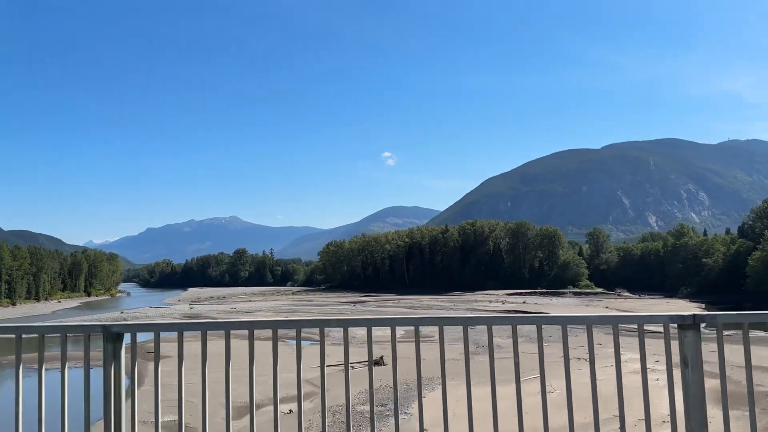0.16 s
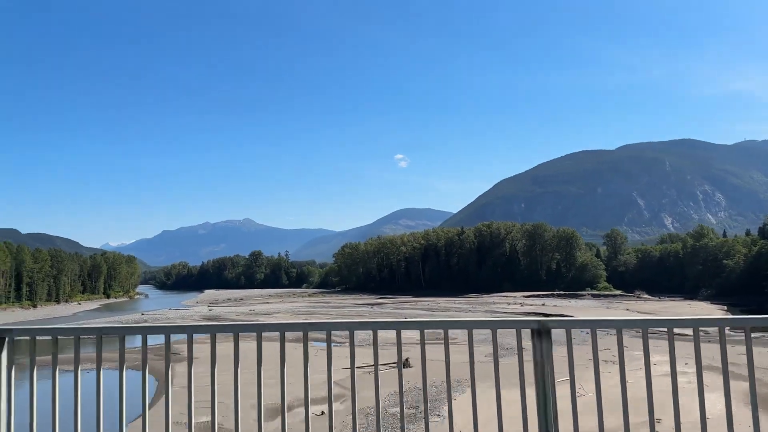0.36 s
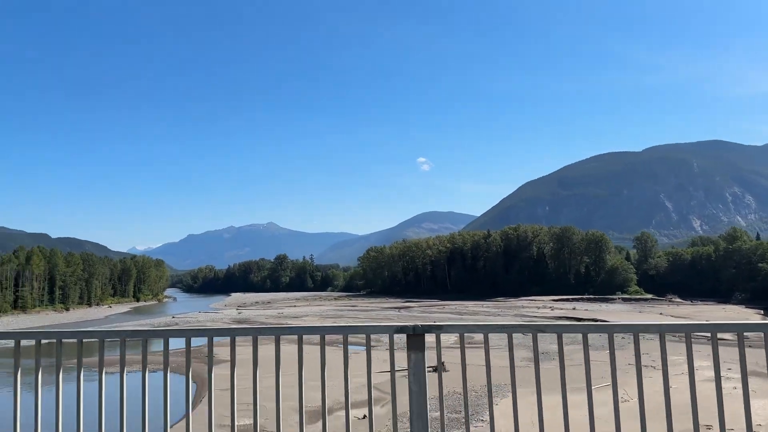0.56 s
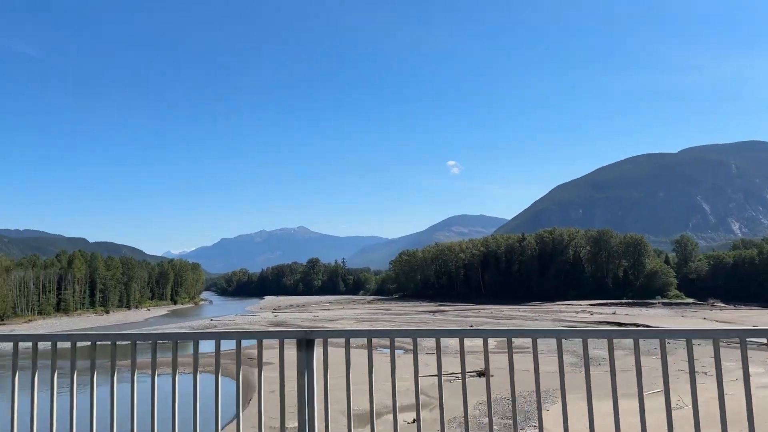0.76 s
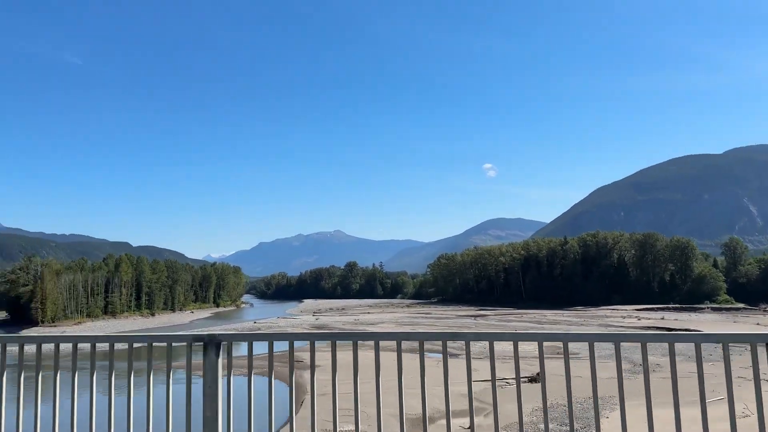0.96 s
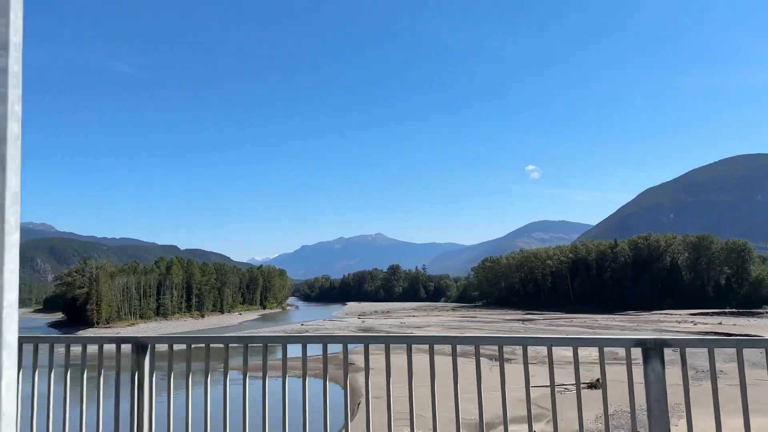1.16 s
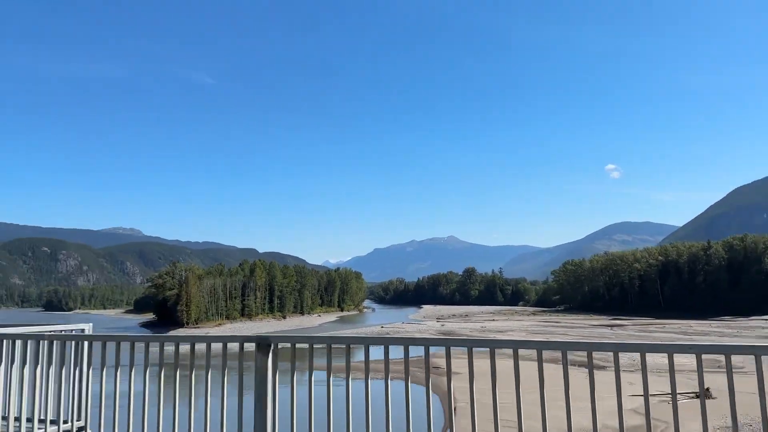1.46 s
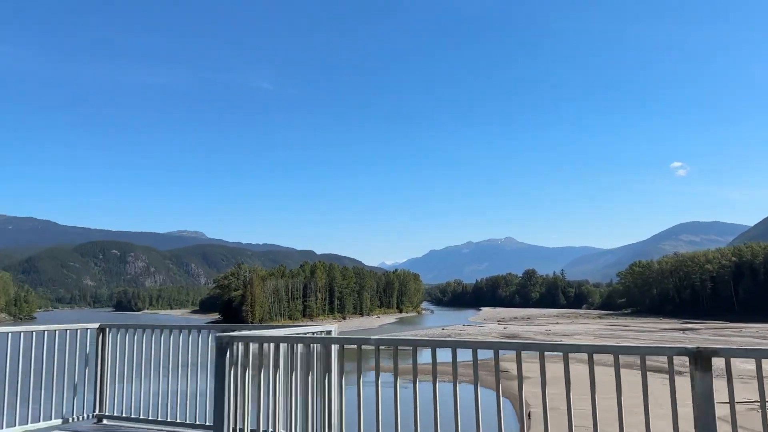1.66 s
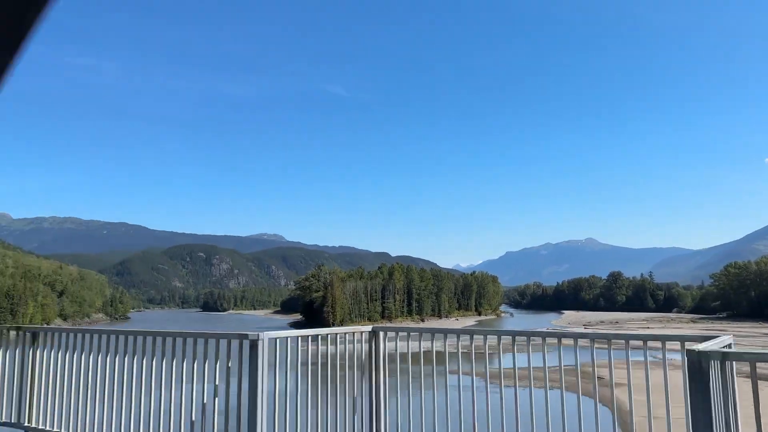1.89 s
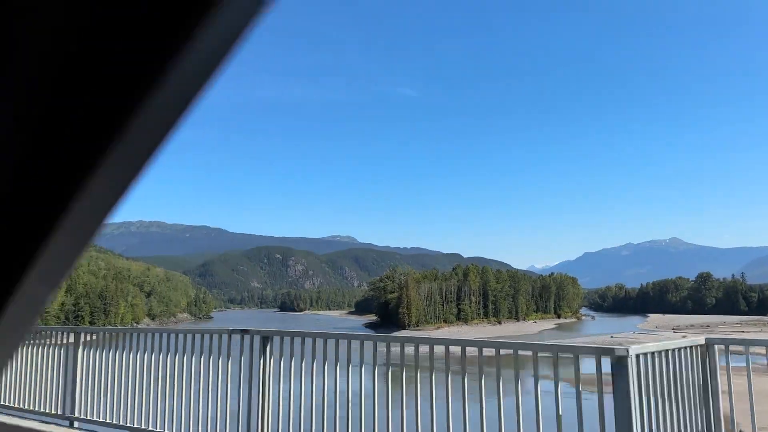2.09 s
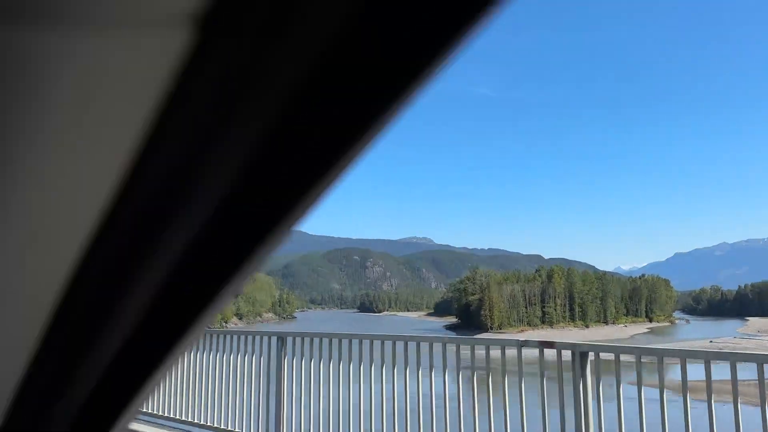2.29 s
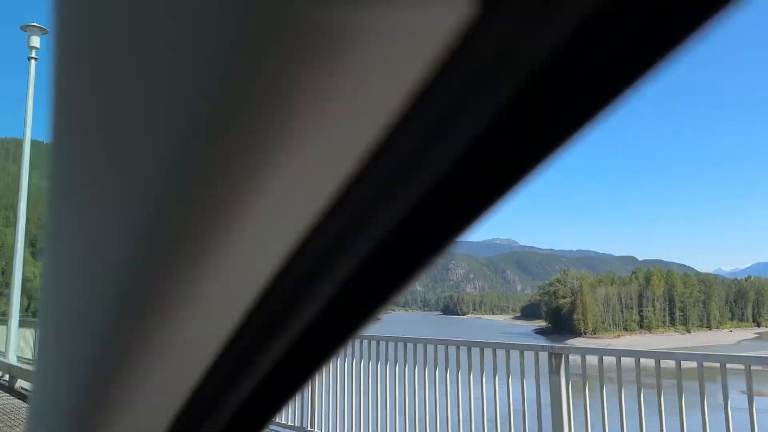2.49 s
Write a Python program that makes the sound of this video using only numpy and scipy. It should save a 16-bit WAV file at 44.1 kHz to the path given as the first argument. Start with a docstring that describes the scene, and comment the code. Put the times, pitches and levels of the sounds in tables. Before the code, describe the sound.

Low road rumble, tyre roar and soft air hiss fill the cabin of a car on a bridge. Quick knocks and thumps come first, then a stronger bump and two deep thuds, before the engine booms louder.

```python
"""Inside a car crossing a bridge. From the start the engine drones over road rumble, tyre roar and air hiss.
In the first second, joints and bumps in the deck thump the body and make the trim knock in quick
succession, among faint rustles and thin squeaks. A harder bump follows and the engine's hum swells.
Just after two seconds come the two heaviest thuds, and at the end the engine booms in the cabin."""
import sys
import numpy as np
from scipy import signal
from scipy.fft import rfft, irfft
from scipy.io import wavfile

SR = 44100
rng = np.random.default_rng(int(sys.argv[2]) if len(sys.argv) > 2 else 0)


def store_wav(level_fs):
    """Save 16-bit WAV to argv[1]."""
    pcm = np.round(np.clip(np.atleast_2d(level_fs), -1, 1) * 32767)
    wavfile.write(sys.argv[1], SR, pcm.T.astype(np.int16))


N = 116424
LOW_LEFT_DB = 1.36  # engine, knocks and thuds sit a little to the left


def amp(db):
    """Decibels to gain."""
    return 10 ** (np.asarray(db) / 20)


def unit(x):
    """Scales to rms 1."""
    return x / np.sqrt(np.mean(x ** 2) + 1e-20)


def curve(points):
    """An automation curve through (seconds, value) points."""
    return np.interp(np.arange(N) / SR, *np.transpose(points))


def read(points, hz):
    """Reads (Hz, value) points on a log-frequency axis."""
    f, value = np.transpose(points)
    return np.interp(np.log(hz + 1), np.log(f + 1), value)


def add(mix, start, sound):
    """Mixes a sound in at a start time in seconds."""
    part = mix[:, max(round(start * SR), 0):][:, :sound.shape[-1]]
    part += sound[..., :part.shape[1]]


def pan(left_db):
    """Left and right gains, with the left louder by left_db."""
    return amp(np.array([[.5], [-.5]]) * left_db)


def wander(top_hz):
    """Random modulation of rms 1, rolling off above top_hz."""
    hz = np.fft.rfftfreq(N, 1 / SR)
    return unit(irfft(rfft(rng.standard_normal(N)) / (1 + (hz / top_hz) ** 4), N))


def noise(gain, likeness=None):
    """Stereo noise of rms 1, shaped by gain(Hz) and leaning left."""
    # Stereo width. Each row: frequency in Hz, likeness of left and right (held within -1 to 1 below).
    likenesses = [(30, 1.5), (85, 0.6), (170, 0.8), (250, 1.05), (390, 0.61), (630, 0.57), (1000, 0.16),
                  (1400, -0.1), (2000, 0.65), (2700, 0.5), (4500, 0.23), (6400, 0.43), (8300, -0.94),
                  (10000, 0.6), (12000, 2.7)]
    # Stereo balance. Each row: frequency in Hz, left minus right in dB.
    balance = [(30, .6), (80, 3.7), (250, 0.26), (500, 4.4), (1000, 4), (2000, 1.4), (4000, 4.4),
               (8000, .6), (14000, .6)]
    hz = np.fft.rfftfreq(N, 1 / SR)
    left, other = rfft(rng.standard_normal((2, N)))
    alike = np.clip(read(likenesses, hz) if likeness is None else likeness, -1, 1)
    right = alike * left + np.sqrt(1 - alike ** 2) * other
    return unit(irfft(np.array([left, right]) * gain(hz) * pan(read(balance, hz)), N))


def rush(spectrum, level, shake_db, shake_hz):
    """A noise bed that rides its level curve and shakes with the road surface."""
    return noise(lambda hz: amp(read(spectrum, hz))) * amp(curve(level) + shake_db * wander(shake_hz))


def swell(u):
    """A quick rise to 1 at u = 2 and an exponential fall."""
    return (u / 2) ** 2 * np.exp(2 - u)


def ring(modes, t, rise_s, scatter=0):
    """Damped modes after a blow; scatter detunes them a little each time."""
    tone = 0
    for hz, db, t60 in modes:
        detune = 1 + scatter * rng.standard_normal()
        tone += amp(db - 60 * t / t60) * np.sin(2 * np.pi * hz * detune * t)
    return (1 - np.exp(-t / rise_s)) ** 2 * tone


def engine():
    """Harmonics of the firing rate, each swelling, fluttering and drifting in the cabin."""
    # Firing rate. Each row: time in seconds, rate in Hz.
    firing = [(0, 89.02), (.35, 88.57), (.7, 87.94), (1.2, 87.5), (1.8, 87.28), (2.4, 86.76), (2.64, 86.5)]
    # First, second and third harmonic. Each row: time in seconds, level in dB.
    boom = [(0, -36.5), (.9, -35.5), (1.08, -24.5), (1.25, -33.5), (1.4, -26), (1.85, -26.5), (2.08, -22.5),
            (2.29, -25), (2.44, -29), (2.495, -12.5), (2.55, -14), (2.64, -16.5)]
    drone = [(0, -16.5), (.055, -52), (.1, -25.5), (.15, -32.5), (.2, -28), (.29, -26), (.335, -21.5),
             (.4, -37), (.62, -43.5), (.68, -21), (.8, -22.5), (.87, -43), (1.05, -28.5), (1.25, -28.5),
             (1.45, -24), (1.78, -23), (1.87, -25), (2.03, -24.5), (2.11, -22.5), (2.2, -17.5),
             (2.29, -30.5), (2.345, -23.5), (2.405, -21), (2.45, -48), (2.57, -21), (2.64, -29.5)]
    hum = [(0, -46), (1.25, -44), (1.4, -34), (1.8, -29), (1.95, -30.5), (2.64, -49.5)]
    # Overtones that follow the hum. Each row: harmonic number, level in dB against the third.
    overtones = [(4, -8), (5, -5), (6, -10.5), (7, -12)]
    turns = np.cumsum(curve(firing) * (1 + .011 * wander(top_hz=17.4))) / SR
    harmonics = [(1, curve(boom)), (2, curve(drone)), (3, curve(hum))]
    harmonics += [(round(k), curve(hum) + db) for k, db in overtones]
    tone = np.zeros(N)
    for k, db in harmonics:
        drift_turns = .08 * np.sqrt(k - 1) * wander(top_hz=19)
        flutter_db = 3 * wander(top_hz=21.8)
        tone += amp(db + flutter_db) * np.sin(2 * np.pi * (k * turns + drift_turns + rng.random()))
    return np.sqrt(2) * tone * pan(LOW_LEFT_DB)


def road_rumble():
    """The deep, uneven rumble of the road under the car."""
    # Tone colour. Each row: frequency in Hz, relative level in dB.
    spectrum = [(15, -42), (30, -29.5), (48, -0.5), (70, 4), (110, -1.5), (160, 1), (220, -11),
                (320, -14.5), (600, -34), (2000, -95.5)]
    # Fader ride. Each row: time in seconds, level in dB.
    level = [(0, -45), (.14, -30.5), (.22, -25), (.35, -28), (.53, -26.5), (.62, -36), (.92, -26),
             (1.1, -27.5), (1.169, -15), (1.23, -37), (1.31, -36), (1.37, -28), (1.6, -29), (1.87, -21.5),
             (2.03, -21), (2.12, -22.5), (2.29, -24), (2.38, -21), (2.64, -23.5)]
    return rush(spectrum, level, shake_db=3.5, shake_hz=15.8)


def tyre_roar():
    """The midrange roar of tyres rolling on the deck."""
    # Tone colour. Each row: frequency in Hz, relative level in dB.
    spectrum = [(60, -31), (200, -11.5), (300, -1.5), (520, 0), (720, -6.5), (1000, -13.5), (1400, -28.5),
                (2500, -57.5), (6000, -80)]
    # Fader ride. Each row: time in seconds, level in dB.
    level = [(0, -33), (.1, -35.5), (.21, -28), (.3, -31), (.5, -36.5), (.68, -34.5), (.95, -34),
             (1.15, -29.5), (1.3, -30), (1.5, -30.5), (1.8, -28), (2.05, -30.5), (2.3, -30.5), (2.4, -28),
             (2.64, -31)]
    return rush(spectrum, level, shake_db=.33, shake_hz=44)


def air_hiss():
    """The soft, broad hiss of air streaming past."""
    # Tone colour. Each row: frequency in Hz, relative level in dB.
    spectrum = [(100, -20.5), (700, 0), (1200, 3), (1700, 1), (2800, -9.5), (4500, -13), (6000, -19.5),
                (7200, -16), (8300, -18.5), (9500, -19), (10600, -21), (11800, -31), (14500, -32.5),
                (16000, -38)]
    # Fader ride. Each row: time in seconds, level in dB.
    level = [(0, -49), (.5, -44.5), (.7, -47.5), (1.3, -46), (2.1, -47), (2.5, -46.5), (2.64, -47)]
    return rush(spectrum, level, shake_db=.66, shake_hz=30)


def rubs(events):
    """Bands of noise that swell quickly and fade slowly."""
    out = np.zeros((2, N))
    for start, length, db, centre_hz, octaves in events:
        progress = np.arange(0, length, 1 / SR) / length
        arch = np.sin(np.pi * progress ** .49)
        band = noise(lambda hz: np.exp(-.5 * (np.log2((hz + 1) / centre_hz) / octaves) ** 2))
        add(out, start, amp(db) * arch * band[:, :len(arch)])
    return out


def rustles():
    """Faint, brief brushes of treble noise."""
    # Each row: start in seconds, length in seconds, level in dB, centre in Hz, width in octaves.
    events = [(.168, 0.08, -49, 4400, 0.66), (.425, 0.053, -55, 4960, 0.43), (.47, .1, -60, 4000, 0.38),
              (1.315, 0.11, -55, 6260, 0.54), (1.565, .04, -56, 11100, 0.23), (2.47, .06, -56, 6900, 0.49)]
    return rubs(events)


def trim_crack(t, pitch_hz):
    """The trim cracks: a burst of grit over two fast-dying modes."""
    # Modes of the snap. Each row: share of the crack's pitch, level in dB, seconds to fall 60 dB.
    snap_modes = [(.68, 11, 0.0083), (1, 4.5, 0.012)]

    def grit_band(hz):
        """Rolls off gently below 300 Hz and steeply above the pitch."""
        return hz / (hz + 300) / (1 + hz / pitch_hz) / np.sqrt(1 + (hz / pitch_hz) ** 6.4)

    burst = swell(t / .00085)
    grit = noise(grit_band, likeness=.5)[:, :len(t)] * burst
    modes = [(share * pitch_hz, db, t60) for share, db, t60 in snap_modes]
    snap = np.array([ring(modes, t, rise_s=.00048, scatter=.028) for side in range(2)])
    return snap + amp(-4.5) * unit(grit) * np.sqrt(np.mean(burst ** 2))


def knock(t, hz, rise_cycles):
    """A damped knock that drops in pitch."""
    sag = .12  # roughly the share of pitch lost each cycle
    turns = np.log1p(sag * hz * t) / sag
    return swell(2 * t * hz / rise_cycles) * np.sin(2 * np.pi * turns)


def bumps():
    """Each bump is a short crack and ring of the trim, a damped knock, then the thud of the cabin modes."""
    # Each row: start in seconds, thud level in dB, knock level in dB, knock pitch in Hz, knock rise in
    # cycles, panel level in dB, panel speed as a ratio, crack level in dB, crack pitch in Hz.
    hits = [(.2025, -25, -15, 275, 1.6, -39, 1.7, -35, 1500),
            (0.2500, -11, -7.5, 230, 0.71, -21, 0.98, -25.5, 1800),
            (.316, -39, -18.5, 171, 1.7, -38, 1.1, -46, 1500),
            (0.3481, -21, -13, 294, 2, -16.5, 1.133, -35, 1610),
            (0.3553, -38, -33, 230, 0.92, -41, 0.73, -37.5, 1750),
            (.418, -22, -14.5, 570, 2.1, -31, .9, -34, 1570),
            (0.4238, -12.5, -10, 528, 1.16, -24, 1.13, -30.5, 1750),
            (0.559, -19, -17.5, 318, 1.5, -35, 1, -48, 1300),
            (0.811, -18.5, -12, 239, 0.86, -19.5, 1.11, -22, 2050),
            (0.901, -17.5, -14.5, 130.4, 1.3, -56, 1, -66, 990),
            (1.1321, -6, -6, 283, 1.36, -16.5, 0.913, -22, 1584),
            (1.1543, -23, -26, 304, 1.1, -29, 1.3, -38, 1740),
            (1.166, -19, -16, 368, 1.6, -27.5, 1.1, -55, 1200),
            (1.943, -13.5, -15.5, 204, 1.03, -30.5, 1.1, -49, 793),
            (2.138, -4.5, -6.5, 204.7, 2.2, -35, .8, -50, 452),
            (2.182, -4, -6, 141.6, 0.99, -27, 0.9, -37, 402)]
    # Cabin and trim panel modes. Each row: frequency in Hz, level in dB, seconds to fall 60 dB.
    cabin_modes = [(72, 5.5, 0.079), (87.3, 3.5, 0.032), (126, -10.5, 0.077), (170.5, -3.5, 0.074)]
    panel_modes = [(375, -1.5, 0.047), (476, 10.5, 0.026), (753, 12, 0.013), (1040, -10, 0.012),
                   (1310, -23, 0.024)]
    out, t = np.zeros((2, N)), np.arange(SR // 4) / SR
    for start, thud_db, knock_db, knock_hz, cycles, panel_db, panel_speed, crack_db, crack_hz in hits:
        crack = trim_crack(t, crack_hz)
        thud = ring(cabin_modes, t, rise_s=.0031)
        panel = ring(panel_modes, t * panel_speed, rise_s=.00088, scatter=.033)
        add(out, start, amp(crack_db) * crack * pan(left_db=3.5))
        add(out, start, amp(panel_db) * panel * pan(left_db=4))
        add(out, start + .001, amp(knock_db) * knock(t, knock_hz, cycles) * pan(LOW_LEFT_DB))
        add(out, start + .0043, amp(thud_db) * thud * pan(LOW_LEFT_DB))
    return out


def cabin_echo(x, wet_db=-15.5, t60=.16, top_hz=930):
    """Adds the short, dull echo of the cabin; the upholstery swallows its highs."""
    t = np.arange(SR // 4) / SR
    tail = rng.standard_normal((2, len(t))) * amp(-60 * t / t60)
    tail = signal.lfilter(*signal.butter(1, top_hz, fs=SR), tail / np.linalg.norm(tail[0]))
    return x + amp(wet_db) * signal.fftconvolve(x, tail, axes=1)[:, :N]


def squeaks(width_octaves=.0077):
    """Thin squeaks: noise in a band so narrow that it has a pitch."""
    # Each row: start in seconds, length in seconds, level in dB, pitch in Hz.
    events = [(0.342, .08, -68, 6320), (0.486, 0.04, -59, 6340), (.752, .045, -65, 6200)]
    return rubs([(*row, width_octaves) for row in events])


def scene():
    """The drive as heard from the seat; only the bumps get the cabin echo."""
    bed = road_rumble() + tyre_roar() + air_hiss()
    return engine() + bed + cabin_echo(bumps()) + rustles() + squeaks()


def record(dry, ceiling=.95, top_hz=15700):
    """A soft clip rounds off the hardest thumps, then a low-pass trims the very top."""
    rounded = dry / (1 + (dry / ceiling) ** 8) ** (1 / 8)
    lowpass = signal.firwin(511, top_hz, window=("kaiser", 9), fs=SR)
    return signal.oaconvolve(rounded, lowpass[None], "same", axes=1)


dry = scene()
out = record(dry)
store_wav(out)
```